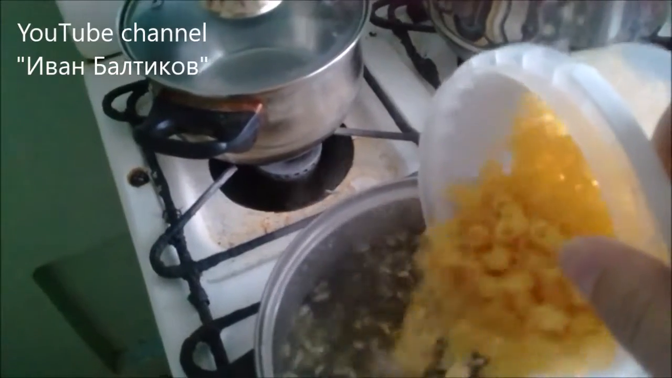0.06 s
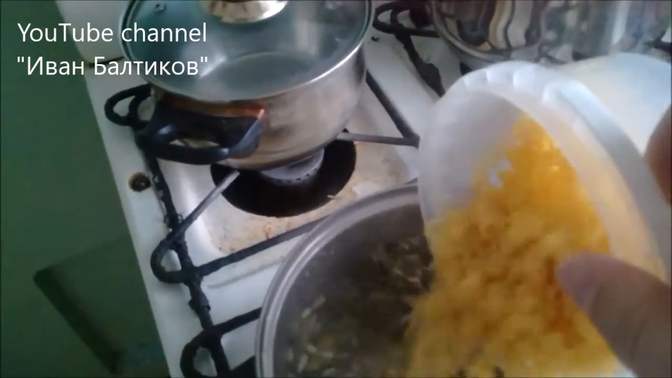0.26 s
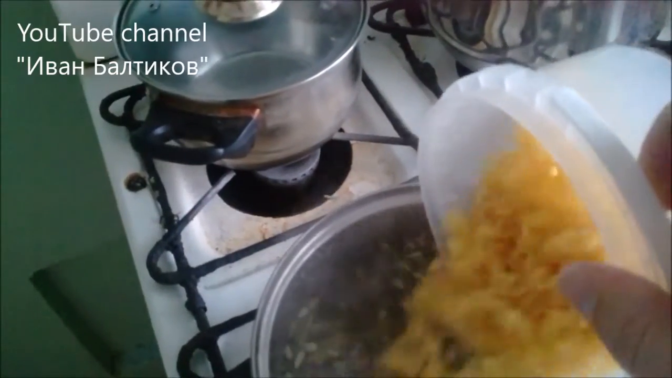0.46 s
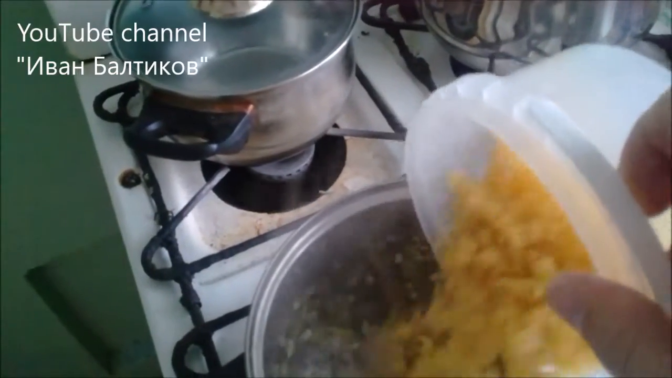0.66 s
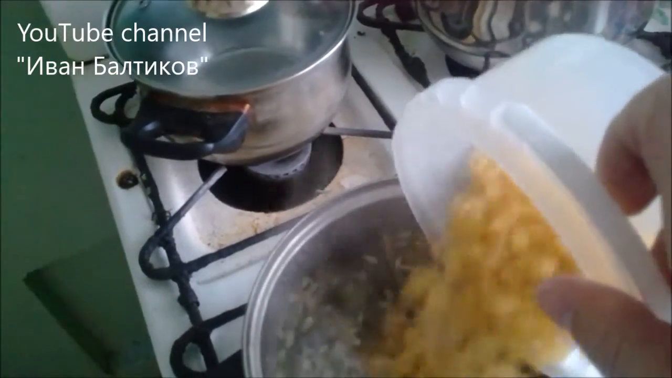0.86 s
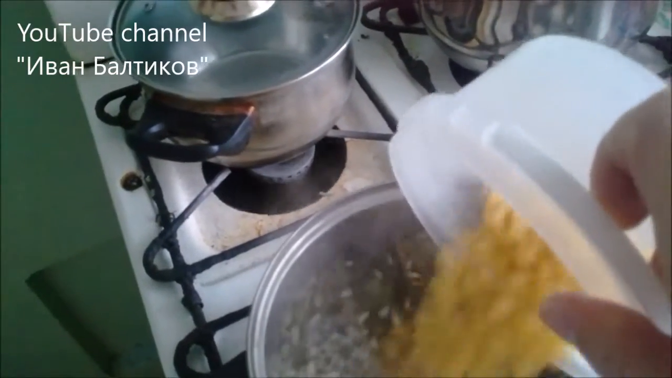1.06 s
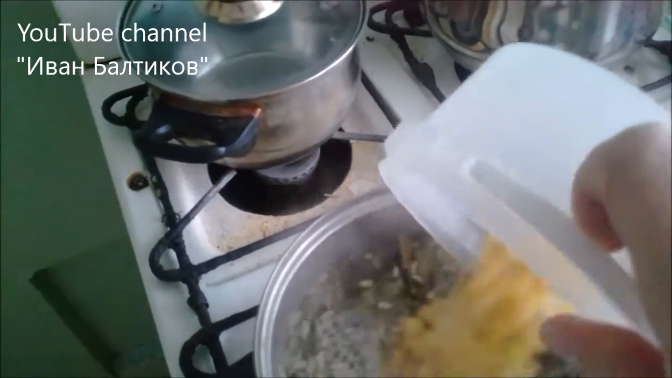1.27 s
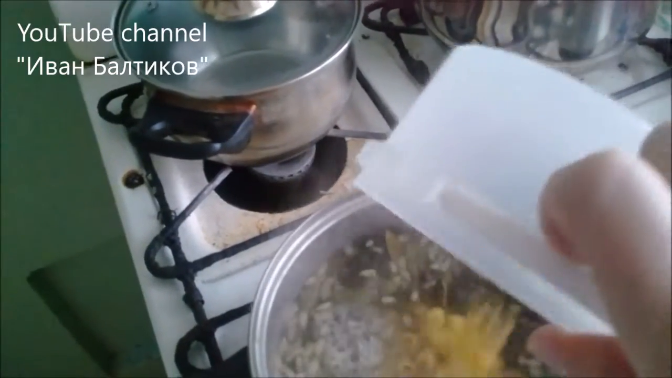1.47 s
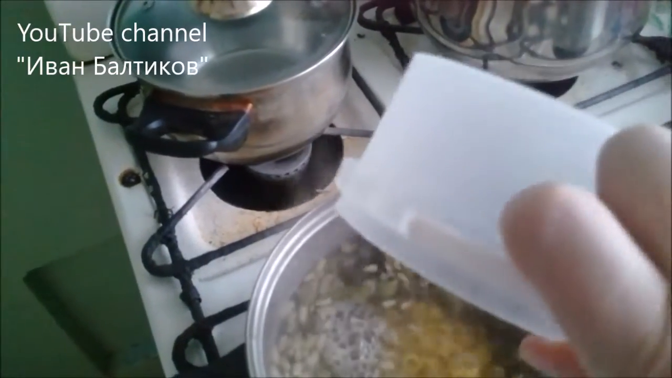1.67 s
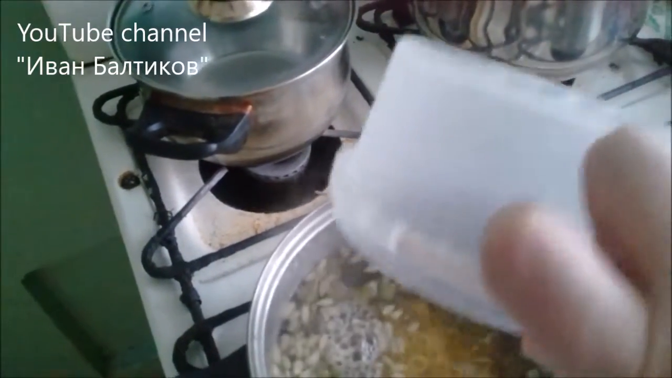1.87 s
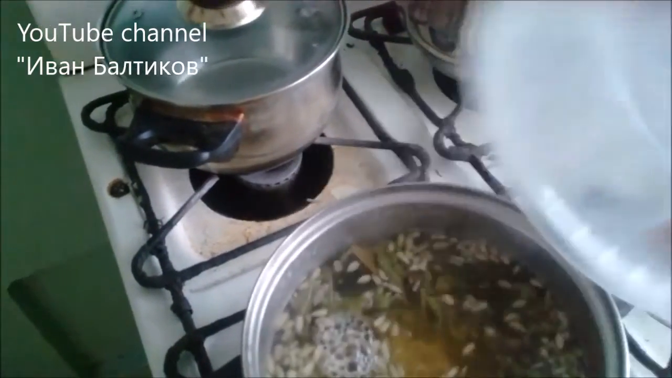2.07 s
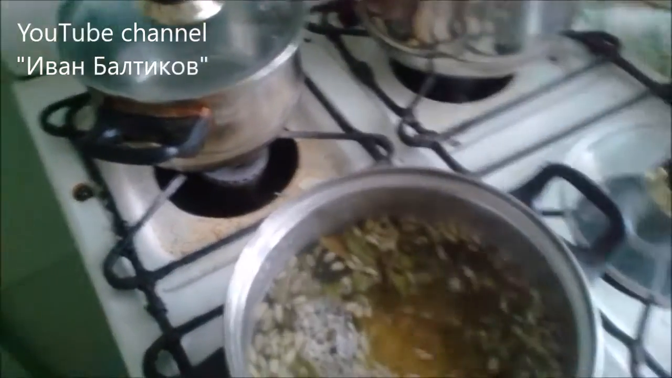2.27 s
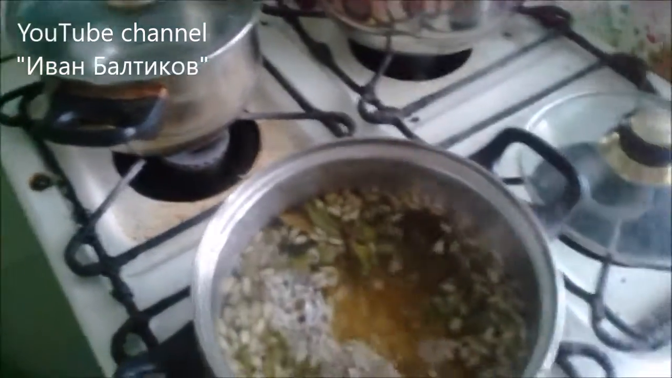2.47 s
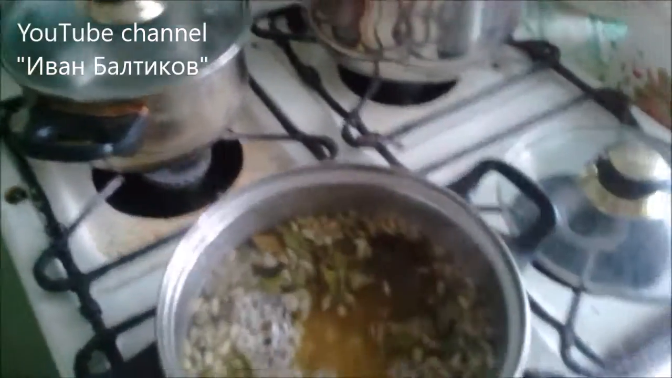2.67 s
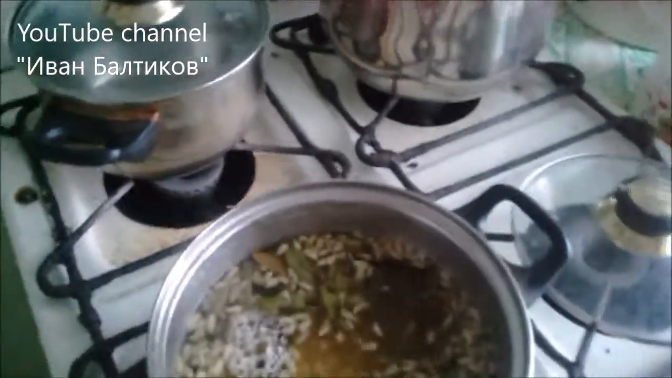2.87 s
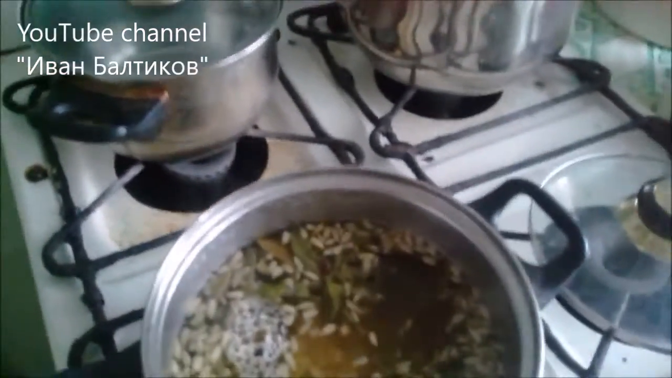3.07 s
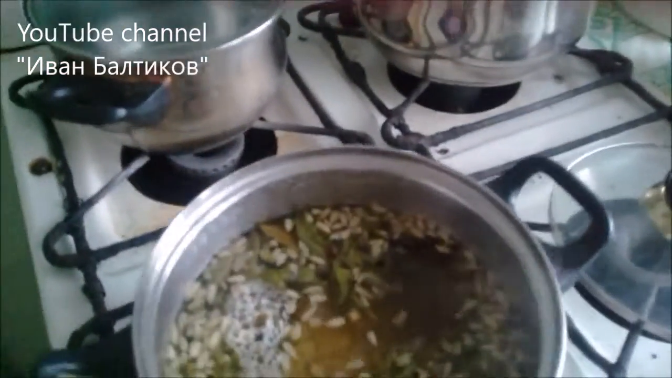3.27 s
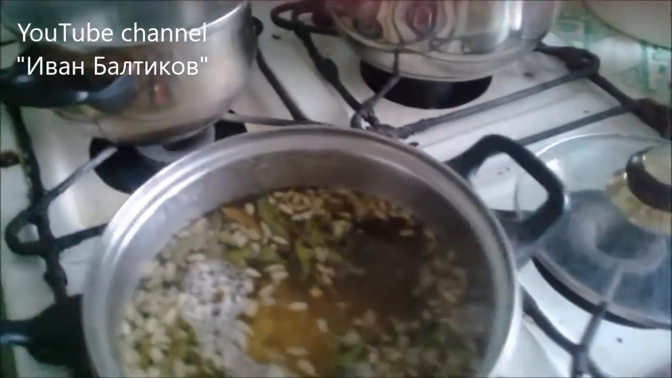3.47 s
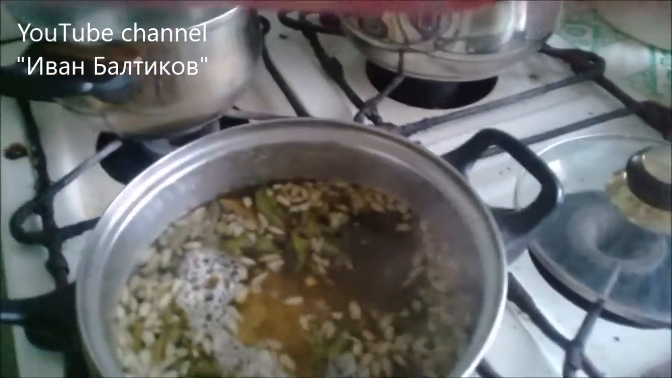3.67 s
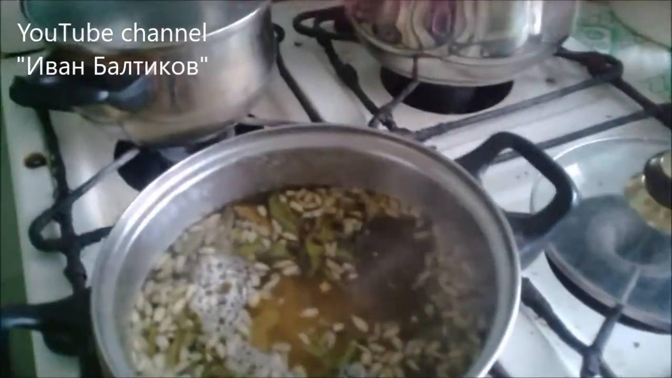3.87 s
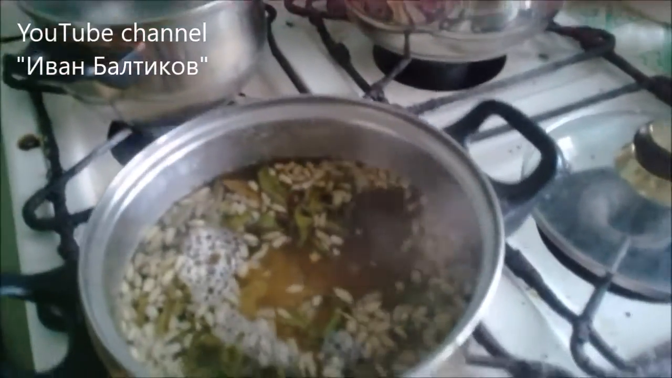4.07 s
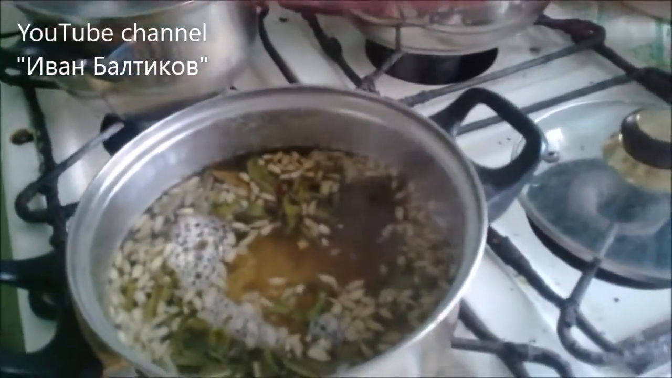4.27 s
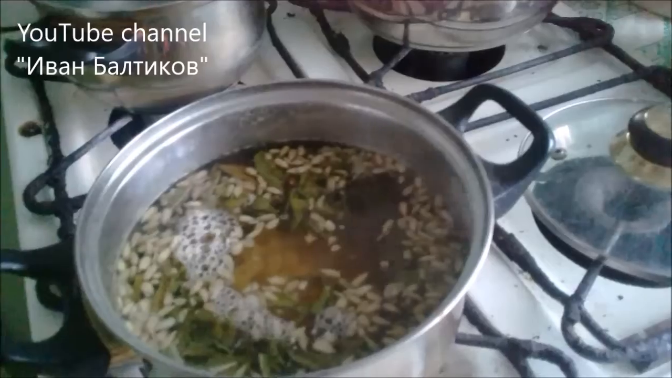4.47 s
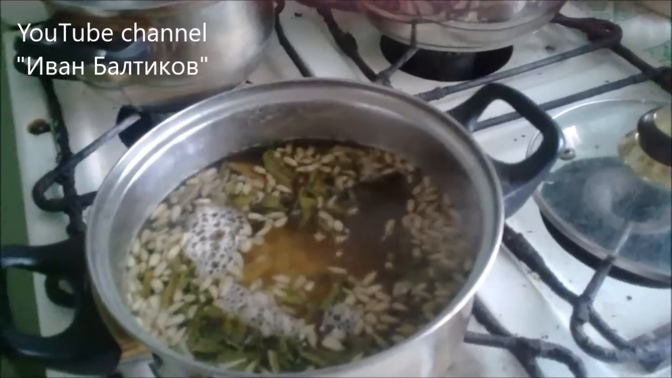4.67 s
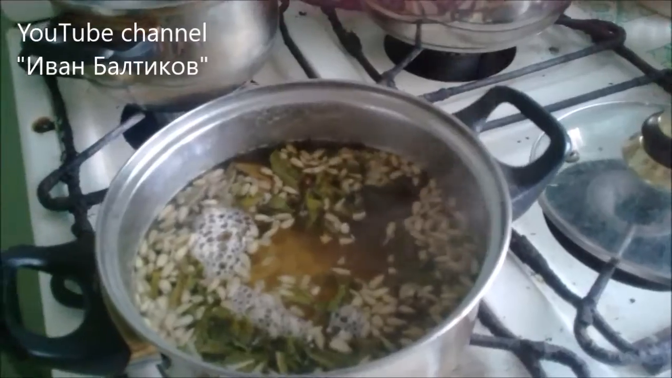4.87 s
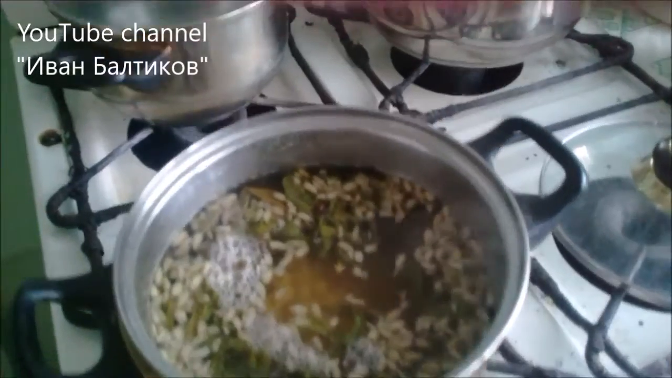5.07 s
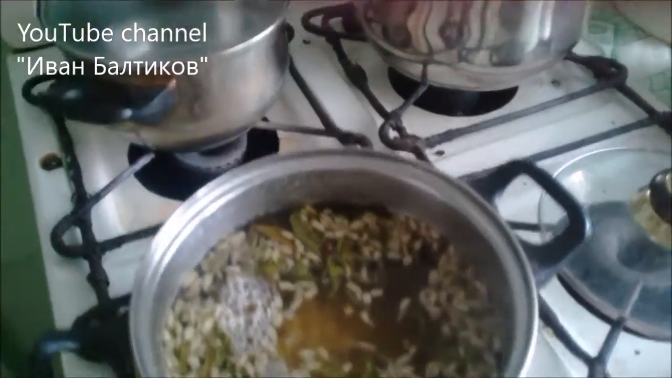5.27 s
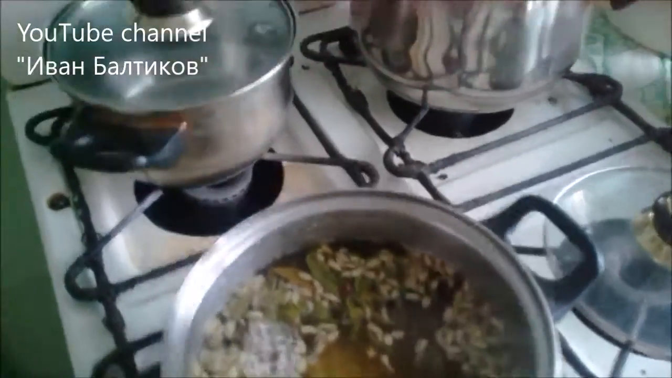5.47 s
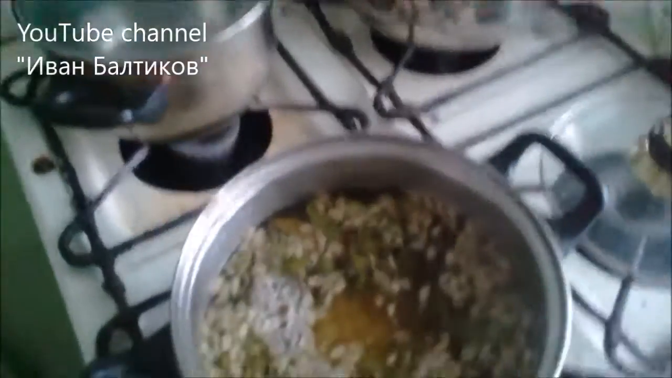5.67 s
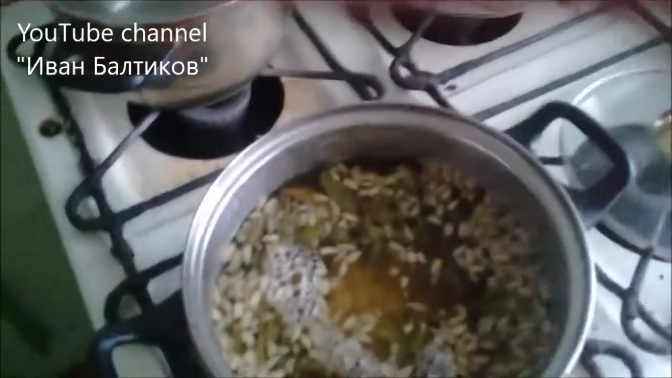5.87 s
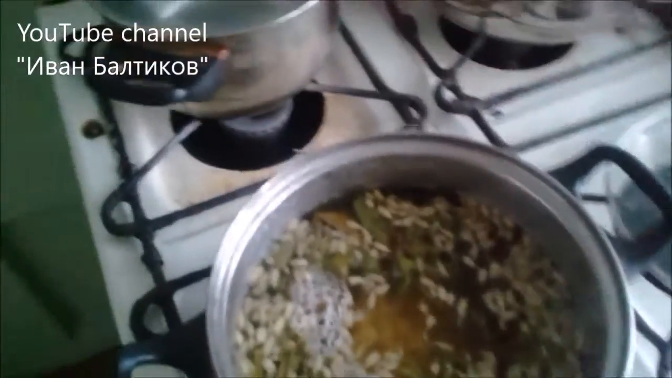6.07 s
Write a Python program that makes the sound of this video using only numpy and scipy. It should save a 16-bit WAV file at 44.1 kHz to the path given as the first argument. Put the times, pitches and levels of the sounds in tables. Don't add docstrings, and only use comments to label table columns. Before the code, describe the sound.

Dry pasta shells pour in a dense, bright rattle into simmering broth, thinning to single clicks, then a quiet kitchen with scuffs and a hollow tub knock.

```python
import sys
import numpy as np
from scipy import signal
from scipy.fft import rfft, irfft, next_fast_len
from scipy.io import wavfile
from scipy.ndimage import uniform_filter1d, map_coordinates

SR = 44100
rng = np.random.default_rng(int(sys.argv[2]) if len(sys.argv) > 2 else 0)


def dump(signal):
    limited = np.clip(np.atleast_2d(signal).T, -1, 1)
    pcm = np.round(limited * 32767).astype(np.int16)
    wavfile.write(sys.argv[1], SR, pcm)


def nominal_scale(level):
    x = np.asarray(level, float) / 20
    return 10 ** x


N = 269803

# time in seconds, level in dB.
FLOW = [
    (0, -29.5),
    (.19, -28.5),
    (.42, -24),
    (.8, -23),
    (1.25, -22),
    (1.45, -26.5),
    (1.53, -39),
    (1.59, -50),
    (1.62, -60),
]
# frequency in Hz, level in dB.
HISS = [(3000, -28.5), (4500, -0.5), (6500, 2), (9000, -1), (12000, -4.5), (15500, -8)]


def unit(x):
    return x / np.sqrt(np.mean(x ** 2) + 1e-20)


def along(points, hz):
    f, v = np.transpose(points)
    return np.interp(np.log(hz + 1), np.log(f + 1), v)


def wobble(rate):
    return map_coordinates(rng.standard_normal(int(N * rate / SR) + 4), [np.arange(N) * rate / SR])


def filtered(x, response):
    m = next_fast_len(x.shape[-1] + 8192)
    spectrum = rfft(x, m) * response(np.fft.rfftfreq(m, 1 / SR))
    return irfft(spectrum, m)[..., :x.shape[-1]]


def causal(points):
    def response(hz):
        cepstrum = irfft(np.log(nominal_scale(along(points, hz)) + 1e-6))
        cepstrum[1:len(hz) - 1] *= 2
        cepstrum[len(hz):] = 0
        return np.exp(rfft(cepstrum, 2 * len(hz) - 2))
    return response


def resonant(modes):
    def response(f):
        return sum((-1) ** k * nominal_scale(db) * 1j * f * width / (centre ** 2 - f * f + 1j * f * width)
                   for k, (centre, width, db) in enumerate(modes))
    return response


def highpass(corner_hz):
    return lambda hz: (1j * hz / (corner_hz + 1j * hz)) ** 2


def port(hz):
    # centre in Hz, width in Hz, level in dB.
    cavity = (10314, 980, 16.9)
    return 1 + resonant([cavity])(hz)


def overlaid(times, grains):
    at = np.round(times * SR).astype(int)[:, None] + np.arange(grains.shape[1])
    return np.bincount(at.ravel(), grains.ravel(), N + grains.shape[1])[:N]


def bursts(times, sizes, t60, rise):
    t = np.arange(220) / SR
    envelope = nominal_scale(-60 * t / t60) * (1 - np.exp(-t / rise))
    puffs = envelope * rng.standard_normal((len(times), len(t)))
    puffs *= (sizes / np.abs(puffs).max(axis=1))[:, None]
    return overlaid(times, puffs)


def notes(times, sizes, body):
    hz, scatter, t60, rise = body
    hz = hz * (1 + scatter * rng.standard_normal((len(times), 1))) * (1 + rise * times[:, None])
    t = np.arange(500) / SR
    envelope = nominal_scale(-60 * t / t60) * (1 - np.exp(-t / 0.00032))
    return overlaid(times, sizes[:, None] * envelope * np.sin(2 * np.pi * hz * t))


def strokes(starts, rises, levels_db, db_per_s):
    bite = 0.54
    power, t = np.zeros(N + SR), np.arange(SR) / SR
    for s, rise, db in np.broadcast(starts, rises, levels_db):
        swell = np.sin(np.pi / 2 * np.clip(t / max(rise, 1e-3), 0, 1)) ** bite
        decay = nominal_scale(db - db_per_s * np.clip(t - rise, 0, None))
        power[round(s * SR):][:SR] += (swell * decay) ** 2
    return np.sqrt(power[:N])


def tail(seconds, stretch):
    # frequency in Hz, t60 in seconds.
    kitchen = [(200, 0.81), (600, 0.59), (1400, 0.47), (3700, 0.48), (9000, 0.12)]
    hz, t, z = signal.stft(rng.standard_normal(int(seconds * SR)), SR, nperseg=256)
    decay = nominal_scale(-60 * t / (stretch * along(kitchen, hz)[:, None]))
    return signal.istft(z * decay, SR, nperseg=256)[1]


def steady(x):
    return x / np.sqrt(np.abs(uniform_filter1d(x ** 2, SR // 25)) + 1e-9)


def hollow_pieces(hz):
    # frequency in Hz, width in Hz, level in dB.
    shell = [(2814, 750, 4.5), (3518, 280, -4.5), (1674, 170, -20), (4750, 360, -18.5)]
    return resonant(shell)(hz) * 1j * hz / (900 + 1j * hz)


def free_piece(hz):
    free = (3407, 686, -1)
    return resonant([free])(hz) ** 2


def crack(blows):
    # frequency in Hz, level in dB.
    bright = [(3500, -46), (4500, 2.5), (5700, -2), (7000, 1.5), (9000, -4.5), (12000, -6), (15500, -16)]
    return filtered(filtered(blows, causal(bright)), port)


def pour():
    # pitch in Hz, pitch scatter as a ratio, t60 in seconds, pitch rise per second.
    wall = (1931, 0.02, 0.015, 0.045)
    # pitch in Hz, pitch scatter as a ratio, t60 in seconds, pitch rise per second.
    piece = (3202, 0.098, .009, .02)
    # frequency in Hz, level in dB.
    hollow_air = [(60, -76), (110, -30.5), (200, -18), (450, -16.5), (750, 2), (1100, 2), (1500, -6),
                  (2000, -30)]
    # time in seconds, level in dB.
    splashes = [
        (0.204, -34),
        (.36, -44.5),
        (.53, -44.5),
        (0.899, -42.5),
    ]
    # time in seconds, level in dB.
    lulls = [
        (.07, -5),
        (.155, -7),
        (.198, -5),
        (.636, -9),
        (1.213, -7),
        (1.468, -6),
        (1.548, -9),
    ]

    t = np.arange(N) / SR
    flow_db = np.interp(t, *np.transpose(FLOW)) + 0.9 * wobble(25)
    thin = np.clip((t - 1.447) / 0.1, 0, 1)

    crowding_db = 3 * wobble(70) + 0.5 * (flow_db + 22).clip(-9, 0)
    rate = 2200 * (1 - 0.3 * thin) * nominal_scale(crowding_db)
    gaps = rng.exponential(size=4200)
    times = np.interp(np.cumsum(gaps), np.cumsum(rate) / SR, t)
    spread = np.clip(rng.standard_normal((4200, 3)), -2, 2.5)
    size = nominal_scale(2.28 * spread[:, 0])
    tone = nominal_scale(0.93 * spread[:, 1])

    blows = bursts(times, size * tone, 0.0096, 0.00013)
    loose = nominal_scale(1.0 + 5 * t.clip(0, 2))
    shells = steady(filtered(blows, hollow_pieces) + loose * filtered(blows, free_piece))
    shells += nominal_scale(-8.5) * steady(notes(times[::3], size[::3], wall))
    piece_gain = nominal_scale(-13.5 + 5.5 * t.clip(0, 2))
    shells += piece_gain * steady(notes(times[1::4], size[1::4] ** 1.7, piece))

    dust = nominal_scale(-13.5 - 4 * thin) * rng.standard_normal(N)
    cracks = steady(crack(bursts(times, size / tone, 0.0052, 0.00013) + dust))
    slide = nominal_scale(flow_db) * (shells + nominal_scale(0.5 + 12.5 * thin) * cracks)

    booms = bursts(times, nominal_scale(3.0 * spread[:, 2]), 0.0085, 0.0011)
    air_gain = nominal_scale(flow_db - 17.5 - 7.5 * t)
    splash_s, splash_db = np.transpose(splashes)
    plunge = strokes(splash_s, 0.006, splash_db, 46)
    slide += np.hypot(air_gain, plunge) * steady(filtered(booms, causal(hollow_air)))

    lull_db = sum(db * np.exp(-((t - s) / 0.007) ** 2) for s, db in lulls)
    fade = np.clip((FLOW[-1][0] - t) / 0.014, 0, 1)
    return fade * slide * nominal_scale(lull_db)


def single_pieces():
    # time in seconds, peak in dB, shell ring in dB relative to it.
    hardest = [(0.0256, -10, -11.5), (0.033, -7, -12), (0.0851, 0, -9.5), (0.105, -5, -11),
               (0.1354, -9.5, -12), (0.1625, -12.5, -17), (0.169, -7, -10), (0.1747, -8, -12.5),
               (0.1887, -14, -13), (0.2505, 3, -12), (0.328, -9.5, -12), (0.3391, -5.5, -4),
               (0.3504, -8, -12.5), (0.3668, -9.5, -12.5), (0.3824, -5.5, -12.5), (0.4125, -6, -13),
               (0.4344, -7, -12), (0.4617, -4.5, -13), (0.61, -6, -14), (0.627, 1.5, -10.5),
               (0.7454, -11, -12), (0.9666, -3.5, -11.5), (1.06, -2.5, -8), (1.091, -3.5, -12),
               (1.115, -4.5, -12), (1.1483, -4, -10.5), (1.1977, -1, -14.5), (1.2568, -5.5, -14),
               (1.271, -6, -14), (1.3327, -7, -12)]
    # time in seconds, peak in dB, shell ring in dB relative to it.
    last = [(1.4396, -12, -12), (1.449, -13.5, -5), (1.4576, -10.5, -2.5), (1.489, -12.5, -6),
            (1.5084, -16, -5), (1.521, -11.5, -16), (1.539, -5.5, -24), (1.5562, -19, -9),
            (1.5615, -15, -17), (1.5714, -14.5, -21), (1.5806, -17.5, -17), (1.5936, -15, -19),
            (1.6024, -20.5, -4.5), (1.6074, -18, -15), (1.6526, -37, -18), (1.6684, -40, -5)]
    s, db, ring_db = np.transpose(hardest + last)
    db = np.minimum(db, -3)
    cracks = crack(bursts(s, nominal_scale(db - 4.5), 0.004, 0.00013))
    hits = bursts(s, nominal_scale(db + ring_db + 8.5), 0.0077, 0.0003)
    clacks = filtered(hits, lambda hz: hollow_pieces(hz) + nominal_scale(-2.5) * free_piece(hz))
    return cracks + clacks


def simmer():
    # frequency in Hz, level in dB per Hz.
    rumble = [(15, -56), (25, -23), (108, -16), (161, -9.5), (521, -8.5), (812, -8), (927, -7), (1210, -11),
              (1580, -4.5), (5000, -19.5), (6500, -43.5), (11000, -120)]
    # time in seconds, peak in dB.
    foam = [(1.8057, -44), (1.8711, -46.5), (2.353, -36.5), (3.5645, -36), (3.702, -34.5), (3.744, -33.5),
            (3.9259, -44.5), (3.9477, -40), (4.3846, -44), (4.4827, -43), (4.522, -32), (4.5543, -31),
            (4.576, -28.5), (4.6279, -38), (4.749, -37), (4.781, -38), (4.8379, -39.5), (5.001, -37),
            (5.039, -37.5), (5.129, -39), (5.1495, -42), (5.222, -44.5), (5.242, -31.5), (5.472, -43),
            (5.5718, -42.5), (5.6254, -41), (5.7785, -48), (5.8301, -42.5), (6.089, -30)]
    # frequency in Hz, level in dB.
    pop = [(3000, -31), (5500, -9), (8000, -3), (12000, 0.5), (15500, -9.5)]
    murmur = unit(filtered(rng.standard_normal(N), causal(rumble)))
    murmur *= nominal_scale(-62.5 + 0.95 * wobble(5.5))

    chance = rng.random((600, 2))
    prickle_db = np.minimum(-4 * np.log(chance[:, 1]), 13) + 9.5
    prickle = bursts(chance[:, 0] * (N / SR - 0.01), nominal_scale(prickle_db), 0.002, 0.0001)
    fizz = unit(filtered(filtered(rng.standard_normal(N) + prickle, causal(HISS)), port))
    surge_db = np.clip(12.5 - 121 * (np.arange(N) / SR - FLOW[-1][0]), 0, 12.5)
    fizz *= nominal_scale(-64 + surge_db + 1.0 * wobble(3.0))

    s, db = np.transpose(foam)
    ticks = filtered(filtered(bursts(s, nominal_scale(db - 6.0), 0.004, 0.0001), causal(pop)), port)
    return murmur + fizz + ticks


def scuffs():
    # start in seconds, rise in seconds, hiss in dB, body in dB relative to the hiss.
    slides = [(1.87, .003, -58, 6), (2.035, 0.089, -43, -3.5), (2.354, .06, -57.5, -3),
              (2.4, 0.033, -50, 0), (2.73, .003, -48, -15), (2.74, .045, -45, -11.5), (2.88, .04, -63, 1),
              (3.192, .004, -44.5, -8), (3.29, 0.018, -58, -5.5), (3.385, 0.044, -55.5, 0.5),
              (3.448, .014, -42.5, 6), (3.56, 0.0082, -49, -5.5), (3.7, 0.058, -54, -2),
              (4.49, 0.12, -57, -5.5), (4.73, 0.1, -62.5, -23), (4.84, 0.083, -61.5, -1),
              (4.981, .05, -72.5, -9.5), (5.47, .04, -64.5, -10), (5.56, 0.0208, -55.5, -5.5),
              (5.64, 0.056, -55, -8), (5.72, .06, -68, -17), (5.917, 0.0032, -50, 2.5),
              (5.925, 0.068, -38.5, -7.5), (6.089, 0.0066, -42.5, 2)]
    # frequency in Hz, level in dB.
    sole = [(150, -33.5), (400, -10.5), (900, -9.5), (1400, -2.5), (2000, -1), (3000, -1), (4500, -5.5),
            (6000, -20)]
    decay_db_per_s = 238.5
    grain = nominal_scale(0.8 * wobble(150))
    hiss = unit(filtered(filtered(grain * rng.standard_normal(N), causal(HISS)), port))
    body = unit(filtered(grain * rng.standard_normal(N), causal(sole)))
    s, rise, db, body_db = np.transpose(slides)
    hiss_gain = strokes(s, rise, db, decay_db_per_s)
    body_gain = strokes(s, rise, db + body_db, decay_db_per_s)
    return hiss_gain * hiss + body_gain * body


def taps():
    # time in seconds, level in dB, pitch in Hz.
    clicks = [
        (1.871, -46, 2000),
        (2.409, -50, 1500),
        (5.918, -33, 1400),
        (6.088, -31.5, 1680),
    ]
    out, t = np.zeros(N + SR), np.arange(SR // 20) / SR
    for s, db, hz in clicks:
        click = np.sin(2 * np.pi * hz * t)
        click += nominal_scale(-0.5) * np.sin(2 * np.pi * 1.75 * hz * t)
        click += 0.4 * rng.standard_normal(len(t))
        out[round(s * SR):][:len(t)] += nominal_scale(db - 60 * t / 0.015) * click
    return filtered(out[:N], highpass(700))


def knocks():
    # time in seconds, peak in dB, upper in dB relative, thump in dB relative, t60 in seconds.
    contacts = [(2.407, -60.5, 20, -35, 0.12), (2.784, -38, -3.5, -23, 0.3), (2.989, -36, -4, -30, 0.62),
                (3.064, -38, -7, -28, 0.48), (3.165, -55, -26, -20, 0.32), (3.192, -31.5, -1, -27.5, 0.39),
                (3.292, -39.5, 0, -34, 0.26), (3.72, -36.5, -5, -35, 0.3), (3.753, -52, 2, -19, 0.24),
                (4.065, -50, 1, -29, 0.59), (4.158, -53.5, 5.5, -25, 0.27), (4.726, -37, -2.5, -29, 0.3),
                (4.834, -39, 0, -23, 0.36), (4.972, -40, -3.5, -30, 0.37), (5.034, -43.5, -1, -24.5, 0.15),
                (5.915, -44, 6, -10.5, 0.21), (6.085, -58, 8, -38, 0.15)]
    # frequency in Hz, level in dB.
    low_colour = [(150, -40), (300, -4.5), (700, 0), (1200, -3), (1700, -32.5)]
    # frequency in Hz, level in dB.
    upper_colour = [(800, -43.5), (1300, 4.5), (2200, -2), (3500, -17), (6000, -28), (12000, -59)]
    # frequency in Hz, level in dB.
    boards = [(60, -34), (110, -1), (170, 5.5), (260, -7), (400, -37.5)]
    out, t = np.zeros(N + SR), np.arange(SR) / SR
    for s, db, upper_db, thump_db, t60 in contacts:
        echo = tail(0.4, stretch=np.clip(t60, 0.05, 1) / 0.47)
        echo = echo * (1 + 0.63 * np.exp(-t[:len(echo)] / 0.002))
        parts = [filtered(echo, causal(colour)) for colour in (low_colour, upper_colour, boards)]
        low, upper, thump = [part / np.std(part[:900]) for part in parts]
        knock = low + nominal_scale(upper_db) * upper + nominal_scale(thump_db + 11) * thump
        at = round((s + 0.003) * SR)
        out[at:at + len(low)] += nominal_scale(db - 13.5) * knock
    return out[:N]


def tub():
    # time in seconds, peak in dB.
    landing = [
        (3.447, -9),
    ]
    # frequency in Hz, level in dB, t60 in seconds.
    walls = [(495, -13, 0.23), (736, -1, 0.39), (772, -5, 0.282), (880, 0, 0.25), (954, -6, 0.23),
             (1038, -5, .28), (1150, -5, 0.18), (1245, -8, 0.246), (1418, -2, .22), (1694, -6, 0.12),
             (1960, -4, .2), (2780, -25, .25), (3200, -20, 0.26), (3450, -24.5, 0.237)]
    # frequency in Hz, level in dB per Hz.
    thud_colour = [(60, -63), (150, -43), (300, -20), (500, -16.5), (750, -6), (1400, -6), (2000, -7),
                   (2400, -21.5), (3300, -24.5), (4500, -41.5), (8000, -43.5)]
    out, t = np.zeros(N + SR), np.arange(int(0.6 * SR)) / SR
    for s, db in landing:
        ring = np.zeros(len(t))
        for hz, level, t60 in walls:
            drift = rng.random() + 0.0025 * np.cumsum(rng.standard_normal(len(t)))
            ring += nominal_scale(level - 60 * t / t60) * np.sin(2 * np.pi * (hz * t + drift))
        ring *= 1 - np.exp(-t / 0.002)
        thud = filtered(tail(0.7, stretch=0.88)[:len(t)], causal(thud_colour))
        both = nominal_scale(-8.5) * ring + nominal_scale(-10.0) * thud / np.std(thud[:900])
        out[round(s * SR):][:len(t)] += nominal_scale(db) * both
    return filtered(out[:N], highpass(80))


def drone():
    # start in seconds, rise in seconds, level in dB.
    hums = [
        (3.83, .02, -64),
        (3.95, 0.071, -73),
        (4.15, .03, -63),
        (4.27, .05, -75),
    ]
    hum = unit(filtered(rng.standard_normal(N), lambda hz: resonant([(137, 22, 0)])(hz) ** 2))
    return strokes(*np.transpose(hums), 86) * hum


def scrape():
    # start in seconds, rise in seconds, level in dB.
    jerks = [
        (4.49, 0.055, -56),
        (4.56, 0.033, -48),
    ]
    # frequency in Hz, width in Hz, level in dB.
    dragged = [(845, 260, -4), (1400, 500, -5.5), (1900, 380, 0.5), (2680, 500, -9.5)]
    grains = nominal_scale(2.1 * wobble(200)) * rng.standard_normal(N)
    rub = filtered(grains, lambda hz: resonant(dragged)(hz) ** 1.27)
    return strokes(*np.transpose(jerks), 183) * unit(rub)


def scene():
    rattle = pour() + single_pieces()
    echo = tail(0.44, stretch=0.69)
    wet = nominal_scale(-17) * signal.fftconvolve(rattle, echo / np.linalg.norm(echo))[:N]
    cooking = rattle + wet + simmer()
    floor = scuffs() + taps() + knocks()
    return (cooking + floor + tub() + drone() + scrape())[None]


def roll_off(x):
    return signal.sosfilt(signal.butter(12, 16660, fs=SR, output="sos"), x)


def record(dry):
    ceiling, knee, top_hz = 0.72, 7, 15900
    held = dry / (1 + np.abs(dry / ceiling) ** knee) ** (1 / knee)
    bass_cut = highpass(40)
    limited = filtered(held, lambda hz: bass_cut(hz) * ((hz < top_hz) + nominal_scale(-32) * (hz >= top_hz)))
    return roll_off(limited - 0.0005)


dry = scene()
out = record(dry)
dump(out)
```